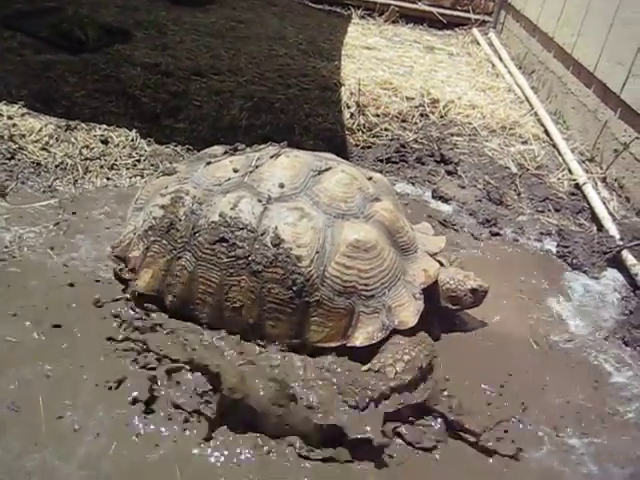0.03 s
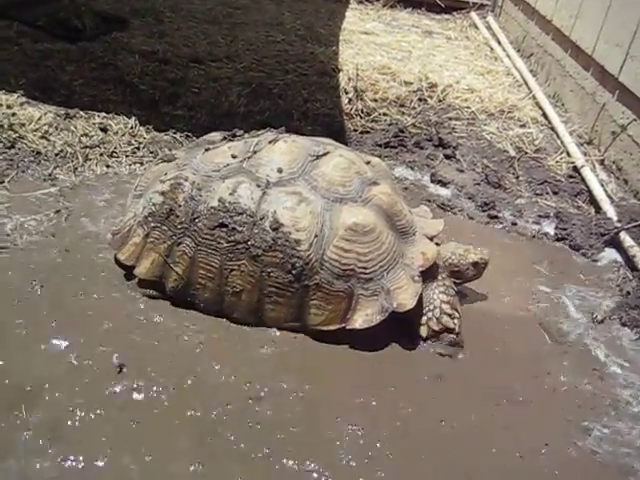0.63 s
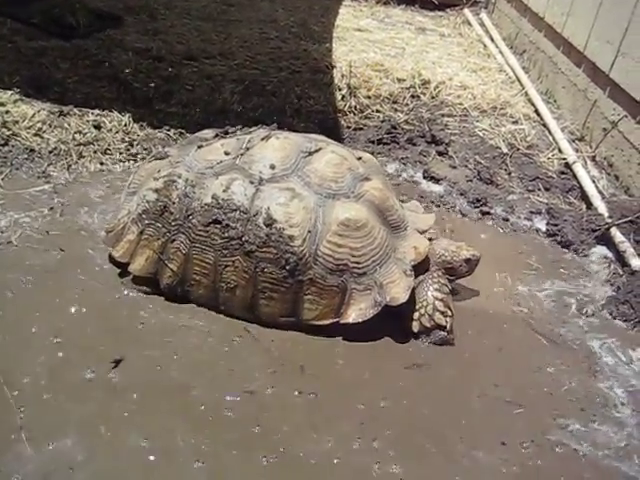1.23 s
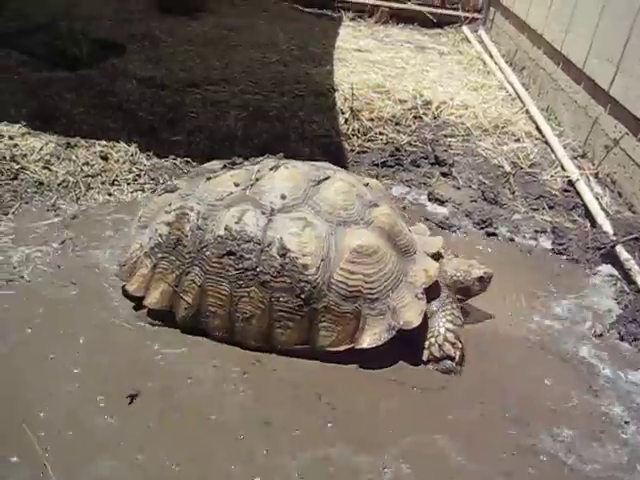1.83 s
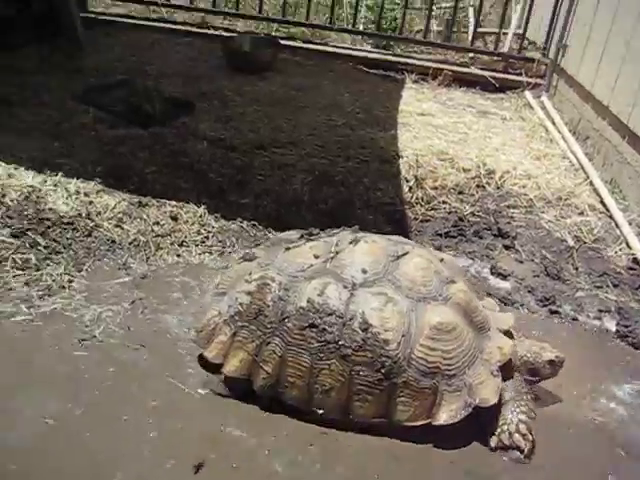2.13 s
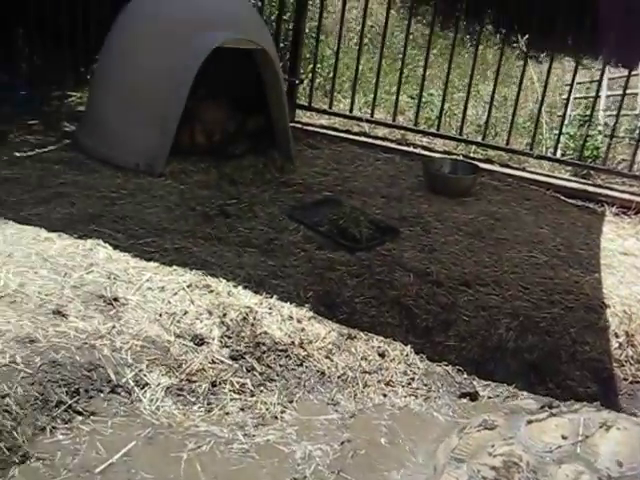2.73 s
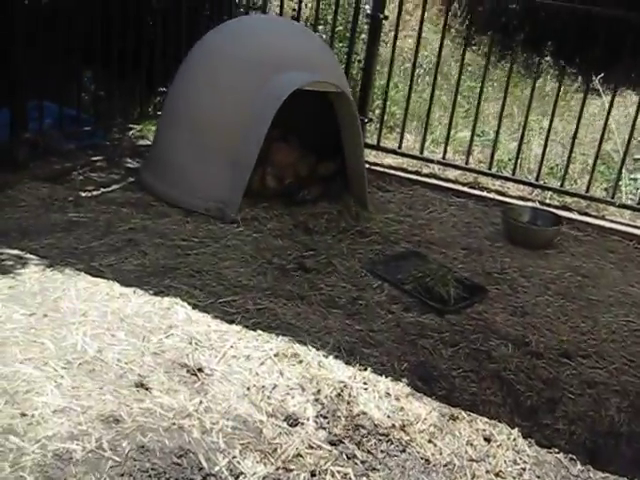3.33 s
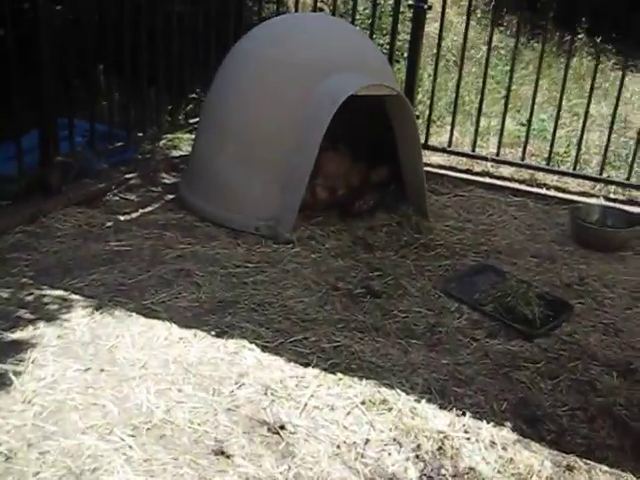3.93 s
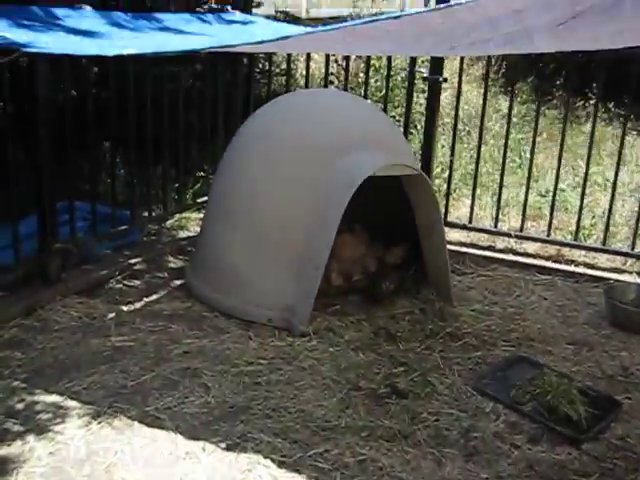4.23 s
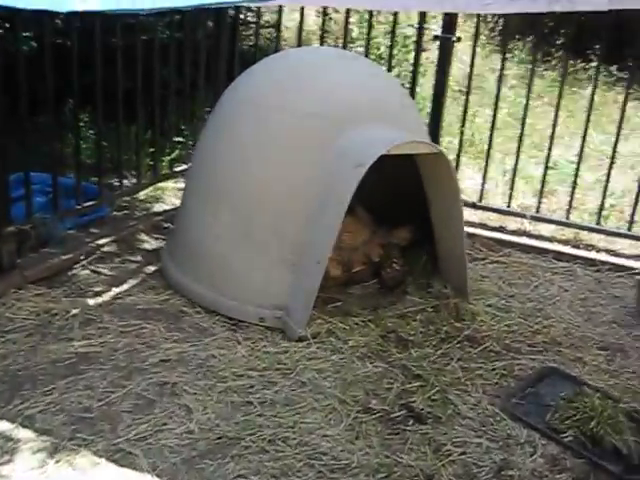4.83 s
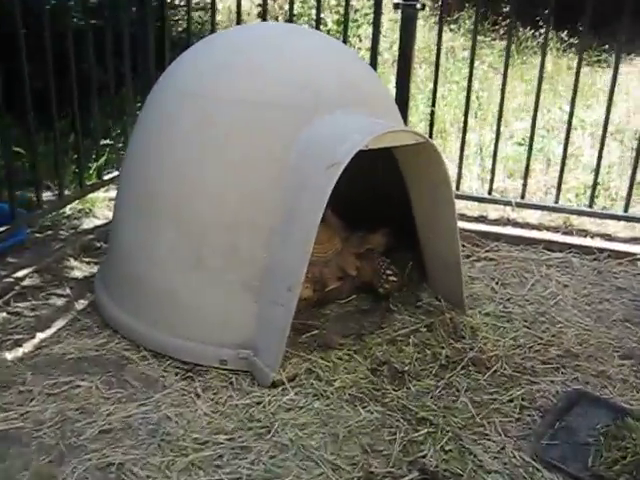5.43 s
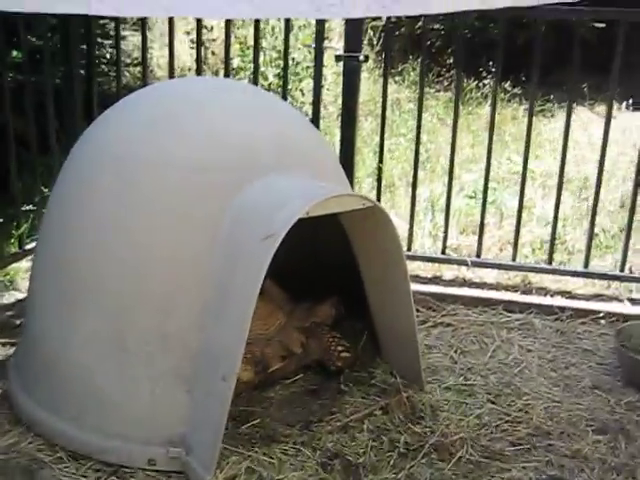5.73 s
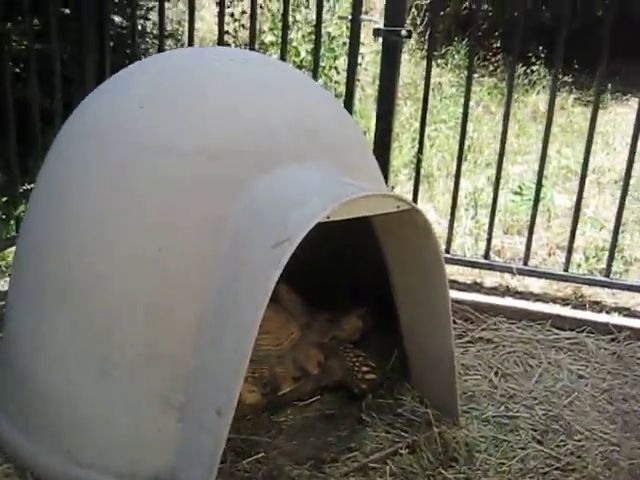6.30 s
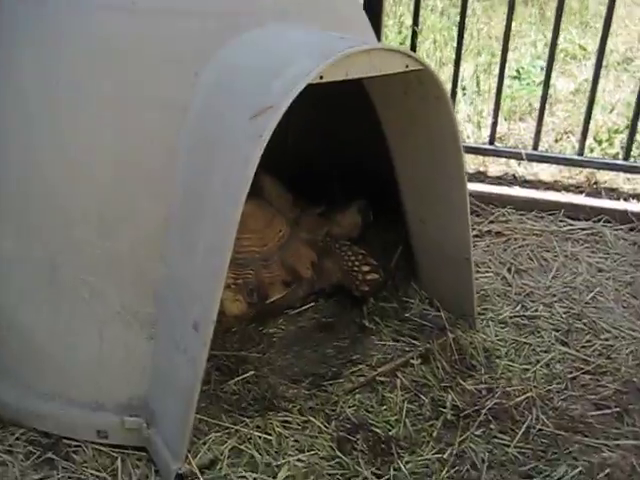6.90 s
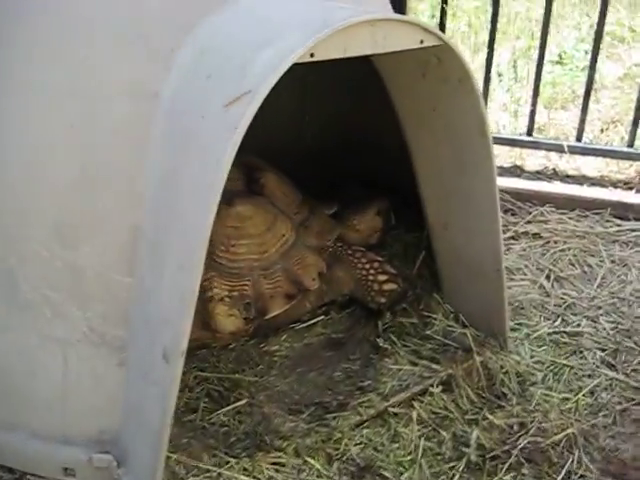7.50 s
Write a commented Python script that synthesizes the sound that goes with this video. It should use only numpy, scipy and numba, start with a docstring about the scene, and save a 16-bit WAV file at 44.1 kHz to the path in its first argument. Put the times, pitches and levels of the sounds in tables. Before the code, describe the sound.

In a quiet outdoor pen, bursts of wet mud splatter as a tortoise throws it over its shell. Air pockets plop and squelch, then drops patter down and pop. Someone carrying a small camera starts walking softly over straw, cracking a few stalks, while the splashes continue, the sixth coming right at the end. Faint chirps, a low far-off motor and a slight high whine from the camera sit beneath a soft rush of air.

```python
"""A tortoise scoops wet mud with its forelegs and flings it over its shell, six times in all.
Each stroke starts with a slap and a gurgle of air pockets; then droplets rain down and thin into splats.
From about 2 s on, someone with a small camera walks across rustling straw, and dry stalks snap.
Meanwhile a far motor's hum gives way to a higher one. The last stroke comes just before the end.
Behind it all lie a quiet yard, the camera's thin whine and now and then a far bird."""
import sys
import numpy as np
from scipy import signal
from scipy.fft import rfft, irfft
from scipy.io import wavfile
from scipy.ndimage import uniform_filter1d
from numba import njit

SR = 44100
rng = np.random.default_rng(int(sys.argv[2]) if len(sys.argv) > 2 else 0)


def pcm_store(signal):
    """Save signal as 16-bit PCM."""
    levels = np.round(np.clip(np.atleast_2d(signal), -1, 1) * 32767)
    wavfile.write(sys.argv[1], SR, levels.astype(np.int16).T)


N = 333396
TIME = np.arange(N) / SR

# Strokes of a foreleg: t/s, push/dB, push fade/(dB/s), gurgle/dB, gurgle fade/(dB/s), mud's flight/s,
# rain/dB, rain fade/(dB/s), mist compared with the spray/dB, foam/dB, dull slap/dB
LEG_STROKES = [(-0.02, -24, 62, -29.5, 27, 0.13, -28, 66, -5.5, -42, -62),
               (0.955, -23.5, 114, -35.5, 43, 0.29, -36.5, 72, -6.5, -59, -41),
               (2.891, -23.5, 60, -31.5, 52, 0.37, -22.5, 151, -5.5, -48, -56),
               (3.942, -23, 46, -24, 51, 0.36, -22.5, 107, -8.5, -52, -30.5),
               (5.522, -19.5, 110, -30, 35, 0.34, -25, 91, -14.5, -59, -37),
               (7.453, -23.5, 88, -30.5, 57, 0.31, -24, 130, -15, -60, -31.5)]
# How strong wet mud sounds from low to high pitch: f/Hz, level/dB
MUD_SPECTRUM = [(180, -64), (300, -26), (392, -2.5), (546, -8), (645, -3.5), (946, -7), (1510, -4.5),
                (2030, 1.5), (4230, -0.5), (7820, -5), (11500, -11.5), (14700, -16.5), (16000, -23)]


def mud_spray():
    """Air pockets gurgle as the leg pushes; drops patter and mist ticks then, and again as mud lands."""
    dig_in_s, gurgle_lag_s = 0.019, 0.022  # large pockets open only once the leg is deep in the mud
    rain_rise_db_per_s, foam_fade_db_per_s = 43.5, 12.5
    gurgle = mud_grains(420, 680, 1450, cycles=19, spread_db=2.4, glide=.3)
    mist = mud_grains(3600, 6500, 15500, cycles=8, spread_db=4.2)
    drops = mud_grains(1800, 1293, 6970, cycles=12.2, spread_db=1.0)
    fizz = mud_grains(3000, 2230, 10600, cycles=6.5, spread_db=3.0)  # the sheet of mud tears
    bubbles = mud_grains(420, 1350, 6000, cycles=33, spread_db=2.6)  # trapped by drops, they ring on
    patter = unit(drops + undb(-2) * fizz)
    flow, mist_gain, gurgle_gain = np.zeros((3, N))
    for (s, push_db, push_fade, gurgle_db, gurgle_fade, flight_s,
         rain_db, rain_fade, mist_db, foam_db, _) in LEG_STROKES:
        lands_s = s + flight_s  # the rain grows until most of the mud has landed
        thinning = fade(lands_s, rain_fade)
        push = undb(push_db) * fade(s + dig_in_s, push_fade)
        rain = undb(rain_db - rain_rise_db_per_s * np.maximum(lands_s - TIME, 0)) * thinning
        foam = undb(foam_db) * fade(lands_s, foam_fade_db_per_s)  # tiny bubbles go on bursting
        thrown = np.hypot(push, rain)
        flow += onset(s, dig_in_s) * thrown
        mist_gain += onset(s, dig_in_s) * np.hypot(thrown * undb(mist_db), foam)
        gurgle_decay = fade(s + gurgle_lag_s, gurgle_fade) * thinning ** 2
        gurgle_gain += onset(s, gurgle_lag_s) * undb(gurgle_db) * gurgle_decay
    # a weak spray falls apart into single drips
    drip_share = np.interp(flow, undb([-42, -26]), [.6, .47])
    wet = flow * (np.sqrt(1 - drip_share) * patter + np.sqrt(drip_share) * bubbles)
    clumping = wander(70)
    spray = wet * undb(1.3 * clumping) + mist_gain * mist * undb(2.8 * clumping)
    return spray + gurgle_gain * gurgle * undb(1.6 * wander(40))


def splats():
    """Wet pops of trapped air with a scatter of droplets, from landing mud or a squelching footstep."""
    # Wet pops: t/s, level/dB, f/Hz, crackle compared with that level/dB, crackle fade/s
    wet_pops = [(0.089, -0.5, 2110, -5.5, 0.0061), (0.101, -3.5, 3540, -1, 0.007),
                (0.1783, 0, 2840, -5.5, 0.0047), (0.2627, -12.5, 2600, -2, 0.0047),
                (0.321, -7, 4700, -16, 0.0029), (0.4521, -10.5, 2000, -9, 0.004),
                (0.9416, -15, 1950, -11.5, 0.02), (0.972, -3.5, 1900, -21, 0.0026),
                (1.012, -6.5, 3440, -1, 0.004), (1.0214, -2.5, 2120, -9.5, 0.0046),
                (1.3263, -9, 3600, -5.5, 0.0085), (1.345, 1, 4130, -10.5, 0.0042),
                (1.459, -10, 4550, -22, 0.017), (2.3406, -9.5, 2245, -22, 0.005),
                (2.3464, -6, 2760, -22.5, 0.013), (2.5589, -15.5, 3060, -5.5, 0.0043),
                (2.634, -17.5, 2900, -5, 0.0053), (2.881, -13.5, 2130, -12, 0.0044),
                (2.902, -12, 3200, -3, 0.005), (2.9137, -2.5, 1465, -0.5, 0.0053),
                (3.1275, -2.5, 2130, -9, 0.0045), (3.182, 1.5, 3900, -22, 0.0032),
                (3.2184, 3, 5400, -27, 0.0034), (3.2535, 1, 3380, -7, 0.0032),
                (3.2832, 3, 4260, -3.5, 0.0029), (3.414, -9.5, 2490, -12, 0.008),
                (3.425, 3.5, 3910, -11.5, 0.0056), (3.942, -10, 2610, -7, 0.011),
                (3.9718, 0, 2080, 0.5, 0.0039), (4.0098, -4, 3700, -6, 0.0058),
                (4.2284, 0, 2270, -6, 0.0074), (4.28, 0, 4380, -23, 0.004), (4.308, 4, 4800, -14, 0.004),
                (4.33, -9, 2690, 2, 0.0058), (4.365, -4.5, 2580, -12, 0.0045),
                (4.505, -9.5, 2720, -1.5, 0.0057), (4.5206, -15, 2150, 0, 0.0052),
                (5.5405, -3, 3270, 2, 0.0047), (5.828, -3.5, 3270, -7, 0.0035),
                (5.8713, 2, 4920, -34, 0.0035), (5.9461, -8, 4260, -13, 0.0072),
                (5.899, -2.5, 2510, -13.5, 0.012), (5.9689, 3.5, 2690, -11.5, 0.0089),
                (6.012, -2.5, 2620, -14.5, 0.0065), (7.432, -4.5, 3440, -20, 0.0098),
                (7.465, 4.5, 2340, -29, 0.0039), (7.4964, 8, 3070, -11, 0.004)]
    s, db, hz, crackle_db, fade_s = np.transpose(wet_pops)
    droplets = mud_grains(7000, 944, 10670, cycles=8.2, spread_db=6)
    pops = squelch(s, db - 2, hz, cycles=17.9, lag_cycles=5.5, glide=0.11)
    droplets_s = s - 0.003  # the droplets start just ahead of the pop
    return pops + bursts(droplets_s, db + crackle_db, rise_s=0.0068, fade_s=fade_s) * droplets


def plops():
    """Large air pockets smack open, then ring with a rising pitch."""
    # The largest air pockets in the mud: t/s, level/dB, f/Hz
    pockets = [(0.039, -7.5, 1640), (0.061, -6, 940), (0.212, -15.5, 1510), (0.299, -17.5, 1760),
               (1.152, -21.5, 630), (1.261, -28.5, 697), (2.326, -17.5, 944), (2.541, -24.5, 950),
               (2.573, -19.5, 1310), (2.961, -13.5, 770), (3.025, -9, 1394), (3.11, -20, 1113),
               (3.073, -13.5, 1090), (3.283, -15.5, 1150), (3.392, -16, 1310), (3.546, -26, 793),
               (3.609, -22, 763), (3.772, -33, 350), (4.295, -13.5, 1100), (4.333, -12, 1275),
               (4.519, -8.5, 2180), (5.454, -17, 900), (5.517, -5, 1890), (5.577, -11, 980),
               (5.611, -14.5, 887), (5.709, -11, 830), (7.37, -19, 1720)]
    s, db, hz = np.transpose(pockets)
    smacks = bursts(s, db - 13, rise_s=0.00073, fade_s=0.0056) * noise(540, 2260)
    return smacks + squelch(s, db + .5, hz, cycles=22, lag_cycles=2.5, glide=.22)


def leg_slaps():
    """The leg hits the mud with a dull slap, a moment after it first touches."""
    touch_s, *_, slap_db = np.transpose(LEG_STROKES)
    return bursts(touch_s + 0.02, slap_db, rise_s=0.00036, fade_s=0.043) * noise(290, 910)


def footsteps():
    """Soft ground takes the weight and gives it back while the straw rustles."""
    # Feet pressing into straw: t/s (at full weight), length/s, dull tread/dB, crunch/dB
    steps = [(1.865, 0.2, -72, -47.5), (2.206, 0.035, -37, -47), (2.362, 0.14, -44.5, -49),
             (2.595, 0.14, -48, -47), (3.63, 0.11, -43.5, -42), (4.726, 0.21, -39.5, -38.5),
             (5.066, 0.083, -67, -46), (5.21, 0.065, -41, -45.5), (6.254, 0.086, -70, -45),
             (7.376, 0.054, -45.5, -36)]
    tread = unit(band(grains(3000, 145, 2160, cycles=8.2, spread_db=3.5), 310, 1040, order=1))
    crunch = unit(band(grains(3000, 1300, 12000, cycles=4, spread_db=3.5), 1400, 6000, order=1))
    out = np.zeros(N)
    for s, length_s, tread_db, crunch_db in steps:
        weight = np.exp(-(2 * (TIME - s) / length_s) ** 2)
        out += weight * (undb(tread_db) * tread + undb(crunch_db) * crunch)
    return out * undb(1.3 * wander(60))


def snapping_stalks():
    """A dry stalk breaks and rings so briefly that it sounds like a click."""
    # Breaking stalks: t/s, level/dB, f/Hz
    snaps = [(0.692, -30, 3260), (1.771, -23, 10500), (1.824, -27, 3440), (1.924, -14.5, 12500),
             (3.637, -20, 4160), (6.0726, -22.5, 3260), (6.2903, -26.5, 3120)]
    s, db, hz = np.transpose(snaps)
    return ring(s + 0.00108, hz, cycles=np.full(len(s), 7.), size=undb(db + 9.5), glide=0., swell=2.7)


def wall_echo(x):
    """Wall and fence add a faint, short echo to the sound."""
    age = TIME[:SR // 2]
    ring_s, delay_s = 0.22, .006
    tail = band(rng.standard_normal(len(age)), 650, 8000, order=1)
    tail *= undb(-60 * age / ring_s) * (age > delay_s)
    return x + undb(-17.5) * signal.fftconvolve(x, tail / np.linalg.norm(tail))[:N]


def settling_ground():
    """Wet ground and straw keep ticking faintly."""
    return undb(-62) * mud_grains(90, 1800, 12000, cycles=6, spread_db=3.5)


def far_birds():
    """Short husky chirps and lower rasping calls, each a soft swell of noise."""
    # Bird calls: t/s, f/Hz, width of the pitch range/Hz, length/s, level/dB
    calls = [(0.475, 4140, 1510, 0.076, -41), (0.553, 3960, 1860, 0.055, -36.5),
             (0.682, 1610, 400, 0.15, -52), (2.747, 1760, 350, 0.2, -47), (6.023, 1780, 300, 0.18, -44),
             (6.603, 3770, 1900, 0.029, -42.5), (6.676, 3830, 1900, 0.039, -42)]
    out = np.zeros(N)
    for s, hz, width_hz, length_s, db in calls:
        swell = np.sin(np.pi * np.clip((TIME - s) / length_s, 0, 1))
        out += undb(db) * swell * noise(hz - width_hz / 2, hz + width_hz / 2)
    return out


def yard_air():
    """Outdoor air makes a soft rush whose level drifts a little."""
    # The air from low to high pitch: f/Hz, level/dB
    spectrum = [(25, -13.5), (55, -12.5), (100, -8), (150, -9.5), (260, -10.5), (550, -11.5), (850, -8),
                (1600, -14), (4200, -14), (8000, -17.5), (12000, -25), (14500, -24), (16000, -26)]
    # The air's loudness over time: t/s, level/dB
    loudness = [(0, -44.5), (1.6, -46.5), (2.7, -45.5), (3.8, -45.5), (4.9, -44.5), (6.2, -45.5),
                (6.9, -47.8), (7.56, -47.5)]
    s, db = np.transpose(loudness)
    rush = unit(colour(rng.standard_normal(N), spectrum))
    return rush * undb(np.interp(TIME, s, db) + .5 * wander(6.8))


def hum_and_whine():
    """A far motor's hum changes as the walker moves on; the camera gives a thin whine."""
    # Two hum tones, then two whine tones: f/Hz, waver/Hz, early level/dB, late level/dB
    tones = [(52, 3, -65, -75), (91.5, 4, -71, -59.5), (7570, 14, -68, -68), (15140, 11, -67, -67)]
    change_s = [2.5, 6.2]
    out = np.zeros(N)
    for hz, waver_hz, early_db, late_db in tones:
        phase = 2 * np.pi * np.cumsum(hz + waver_hz * wander(28)) / SR
        level_db = np.interp(TIME, change_s, [early_db, late_db]) + 2 * wander(10)
        out += np.sqrt(2) * np.sin(phase) * undb(level_db)
    return out


@njit
def ring(s, hz, cycles, size, glide, swell):
    """Short tones that build over `swell` radians and die by 60 dB as pitch rises by the share `glide`."""
    out = np.zeros(N)
    for k in range(len(s)):
        start, length, phase = int(s[k] * SR), cycles[k] * SR / hz[k], 0.
        for i in range(max(0, -start), min(int(length), N - start)):
            phase += 2 * np.pi * min(hz[k] * (1 + glide * i / length) / SR, .45)
            attack = 1 - np.exp(-(phase / swell) ** 2)
            out[start + i] += size[k] * np.sin(phase) * attack * np.exp(-6.9 * i / length)
    return out


def squelch(s, db, hz, cycles, lag_cycles, glide):
    """An air pocket bursts, then two weaker ones near its pitch follow as the mud closes."""
    life = np.full(len(s), float(cycles))
    out = ring(s + .0005, hz, life, undb(db), glide, swell=11.4)
    for turn in (1, 2):
        lag, detune = rng.random((len(s), 2)).T
        start_s = s + (turn + lag / 2) * lag_cycles / hz
        near_hz = hz * 2 ** (detune - .55)
        out += ring(start_s, near_hz, 1.07 * life, undb(db - 5 * turn), glide=0.056, swell=13.5)
    return out


def grains(per_s, lo_hz, hi_hz, cycles, spread_db, glide=0.33):
    """A stream of tiny random pings, a few louder than the rest, each lasting roughly `cycles` waves."""
    when, pitch, life, loud, sign = rng.random((int(per_s * N / SR), 5)).T
    hz = lo_hz * (hi_hz / lo_hz) ** pitch
    db = -spread_db * np.log(np.maximum(loud, .02))
    size = undb(db) * hz * np.sign(sign - .5)  # high pings are shorter, so they are made stronger
    return unit(ring(when * N / SR, hz, cycles * 2 ** (2 * life - 1), size, glide, swell=cycles * 0.26))


def mud_grains(per_s, lo_hz, hi_hz, **settings):
    """Tiny ringing air pockets with the tone of wet mud."""
    return unit(colour(grains(per_s, lo_hz, hi_hz, **settings), MUD_SPECTRUM))


def bursts(s, db, rise_s, fade_s):
    """A loudness curve that jumps up at each time in s and dies away."""
    out = np.zeros(N)
    for start_s, gain, fall_s in np.broadcast(s, undb(db), fade_s):
        start = int(start_s * SR)
        age = TIME[:min(SR // 4, N - start)]
        out[start:start + len(age)] += gain * np.exp(-age / fall_s) * (1 - np.exp(-age / rise_s))
    return out


def onset(s, rise_s):
    """A gain that climbs from 0 to 1, starting at time s."""
    return np.clip((TIME - s) / rise_s, 0, 1)


def fade(s, db_per_s):
    """A gain that holds until time s and then falls steadily."""
    return undb(-db_per_s * np.maximum(TIME - s, 0))


def wander(per_s):
    """A smooth random curve of typical size 1 that takes per_s new values a second."""
    hold = int(SR / per_s)
    stairs = np.repeat(rng.standard_normal(N // hold + 1), hold)
    return unit(uniform_filter1d(stairs, hold)[:N])


def colour(x, points):
    """Shape the tone by (f/Hz, level/dB) points while keeping attacks sharp."""
    hz, db = np.transpose(points)
    size = 2 ** 14
    log_hz = np.log(np.fft.rfftfreq(size, 1 / SR) + 1)
    log_gain = np.log(undb(np.interp(log_hz, np.log(hz), db)))
    # fold the filter so that nothing rings ahead of a hit
    cepstrum = irfft(log_gain)
    cepstrum[1:size // 2] *= 2
    cepstrum[size // 2:] = 0
    return signal.fftconvolve(x, irfft(np.exp(rfft(cepstrum))))[:N]


def band(x, lo_hz, hi_hz, order=2):
    """Keep the pitches between lo_hz and hi_hz."""
    return signal.sosfilt(signal.butter(order, [lo_hz, hi_hz], "band", fs=SR, output="sos"), x)


def noise(lo_hz, hi_hz):
    """Hiss between two pitches."""
    return unit(band(rng.standard_normal(N), lo_hz, hi_hz))


def undb(db):
    """Turn decibels into a gain to multiply by."""
    return 10 ** (np.asarray(db) / 20)


def unit(x):
    """Scale to an average strength (rms) of 1."""
    return x / np.sqrt(np.mean(x ** 2))


def scene():
    """Mud and footsteps echo in the pen, over the quiet yard; one channel."""
    pen = mud_spray() + splats() + plops() + leg_slaps() + footsteps() + snapping_stalks()
    return (wall_echo(pen) + settling_ground() + far_birds() + yard_air() + hum_and_whine())[None]


def record(dry):
    """Round off the loudest peaks and cut the highest treble."""
    top_hz = 15650
    return signal.sosfilt(signal.ellip(10, .2, 80, top_hz, fs=SR, output="sos"), np.tanh(dry))


dry = scene()
out = record(dry)
pcm_store(out)
```